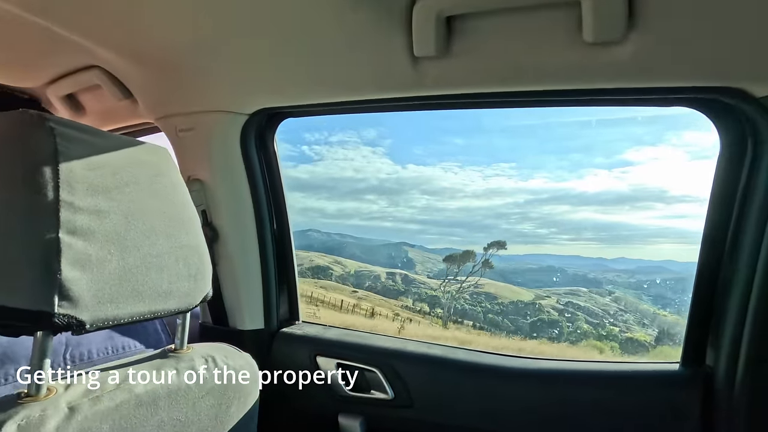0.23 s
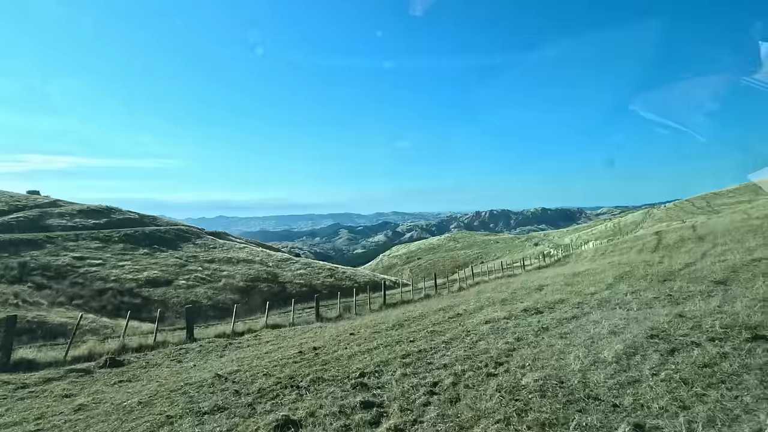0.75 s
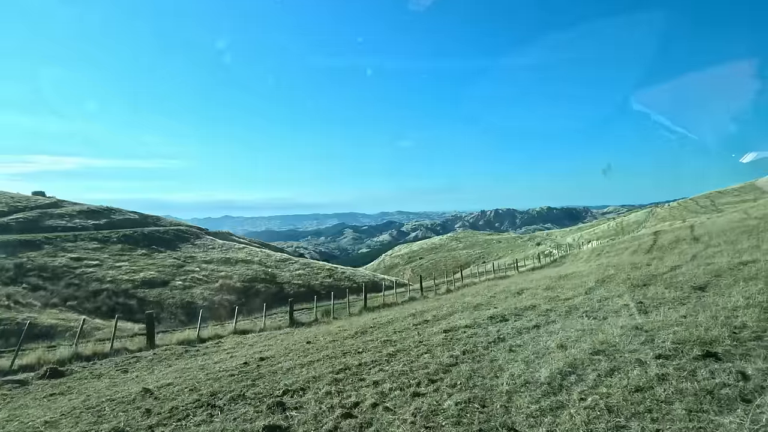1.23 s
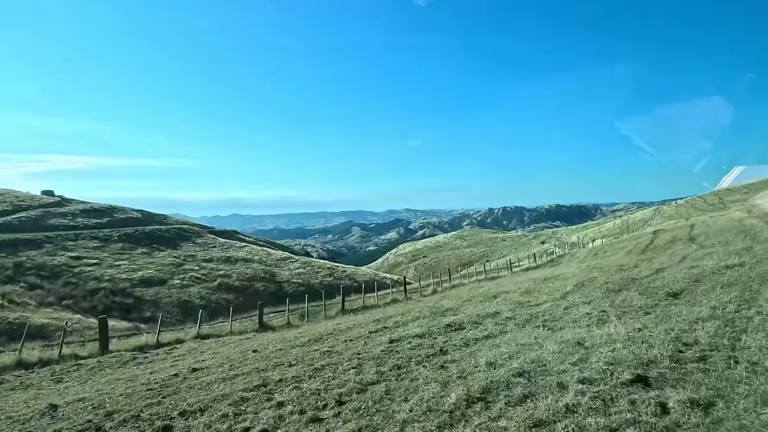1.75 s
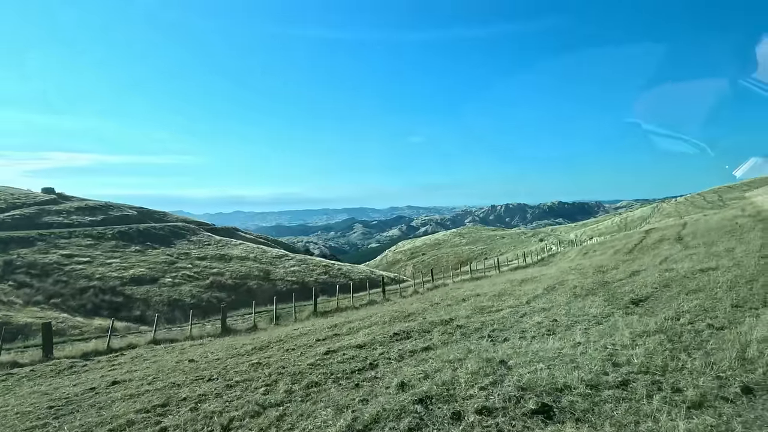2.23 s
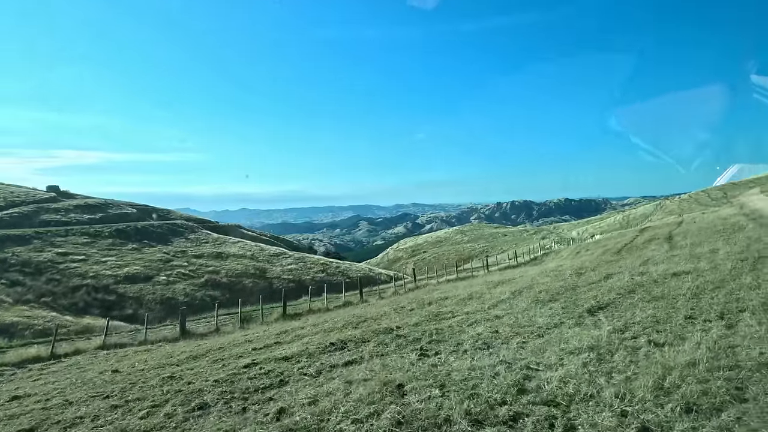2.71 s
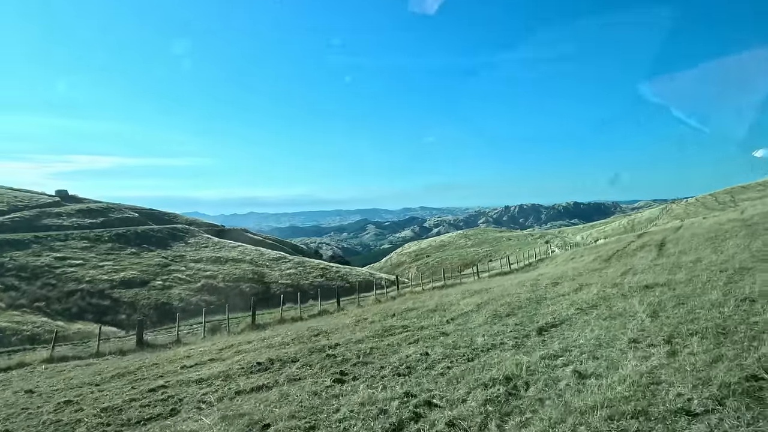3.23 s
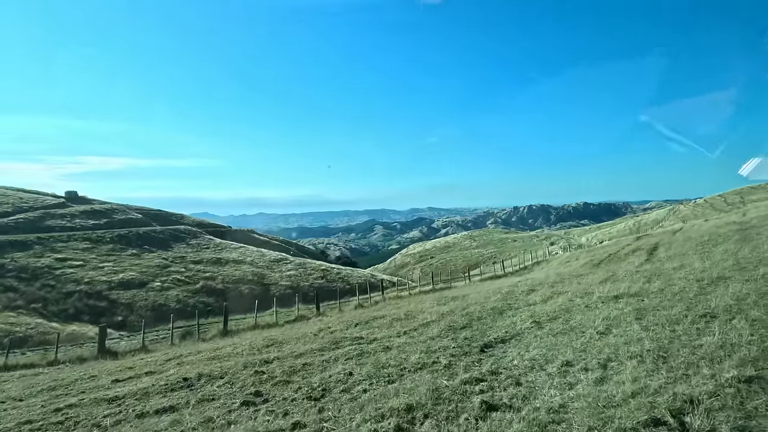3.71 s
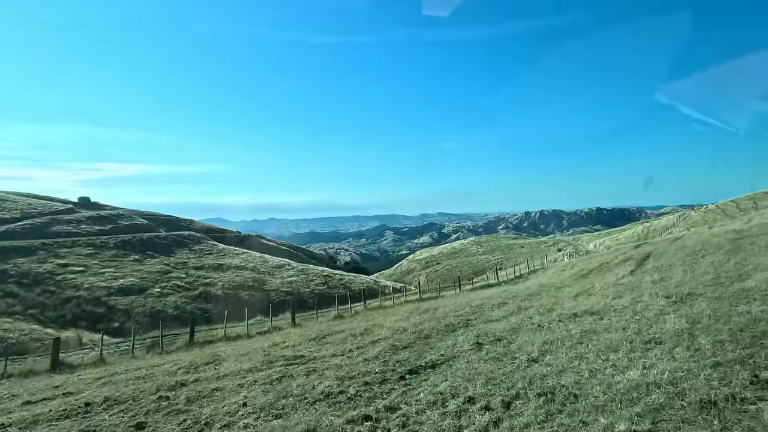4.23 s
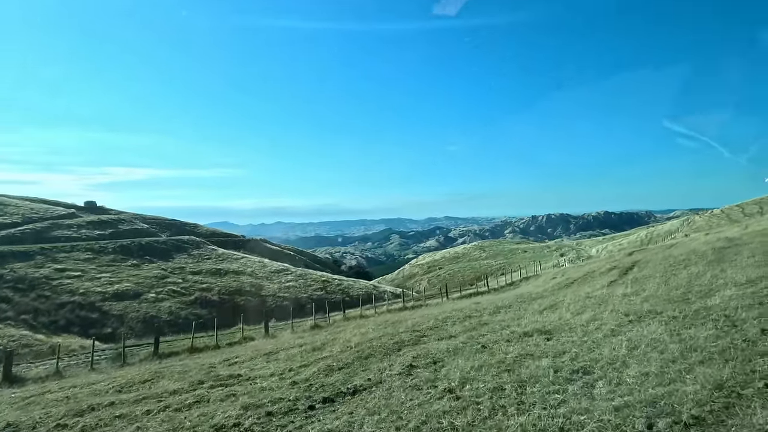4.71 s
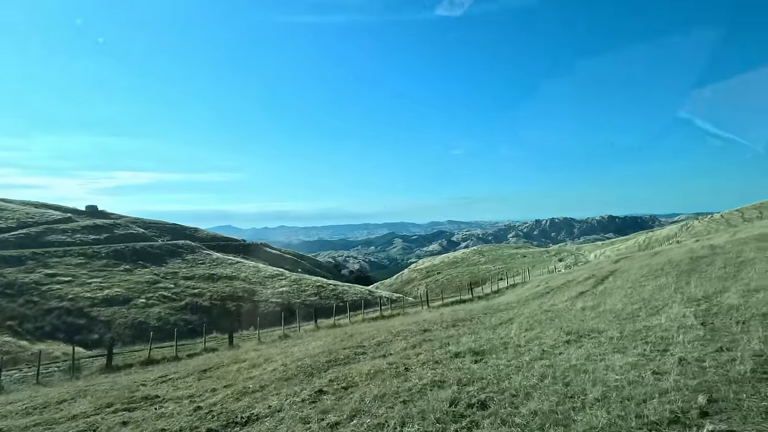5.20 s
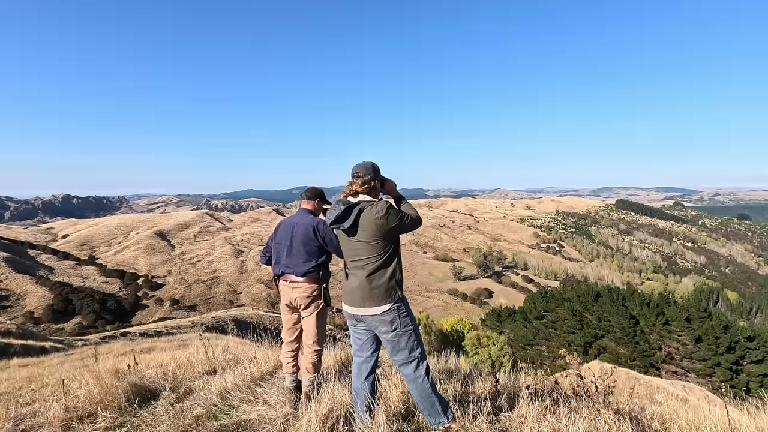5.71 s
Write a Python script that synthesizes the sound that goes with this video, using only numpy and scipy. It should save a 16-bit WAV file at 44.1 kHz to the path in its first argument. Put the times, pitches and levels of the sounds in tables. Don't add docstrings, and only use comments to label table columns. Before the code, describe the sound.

Close stereo microphone inside a car driving slowly over bumpy pasture: very deep heaving boom, tyre rumble and muffled road roar. A change of seat at 0.7 s brings in a wavering gear hum. Thuds, plastic clacks, buckle rattles, fabric rustles and faint squeaks come irregularly. At about 5.5 s it cuts to an open hill, where wind buffets the bare microphone.

```python
import sys
import numpy as np
from scipy import signal
from scipy.fft import rfft, irfft, next_fast_len
from scipy.io import wavfile
from scipy.ndimage import uniform_filter1d, map_coordinates

SR = 44100
rng = np.random.default_rng(int(sys.argv[2]) if len(sys.argv) > 2 else 0)


def to_wav(sig):
    pcm = np.clip(np.atleast_2d(sig), -1, 1) * 32767
    pcm = np.round(pcm).astype(np.int16)
    wavfile.write(sys.argv[1], SR, pcm.T)


def volts_from_db(level):
    exponent = np.asarray(level, float) / 20
    return 10 ** exponent


N = 262826
SEAT_CUT_S, OUTDOOR_CUT_S = .705, 5.46

# [time_s, pitch_hz]
BOOM = [(0, 16.65), (1.3, 20.3), (2.2, 18.35), (2.6, 17.54), (4.0, 17), (4.7, 16.65), (5.5, 18.2)]
# [peak_s, boom_db]
HEAVES = [(0, -16), (.15, -17), (.38, -14), (.6, -16.5), (.78, -16.5), (1.08, -22.5), (1.265, -12),
          (1.498, -16.5), (1.72, -18), (2.0, -18.5), (2.221, -14), (2.63, -11.5), (2.9, -18), (3.1, -19.5),
          (3.428, -14.5), (3.82, -16), (4.049, -18.5), (4.27, -15.5), (4.57, -13), (4.8, -26),
          (4.98, -13.5), (5.33, -12.5)]
# [freq_hz, density_db]
SHAKE = [(5, -12), (9, -12), (14, -5), (25, -5), (34, -3.5), (42, -13), (60, -31.5), (150, -120)]
# [time_s, level_db]
GROUND = [(0, 2.5), (.25, 4), (.7, 5.5), (.8, -1), (1.6, -5), (1.9, 5.5), (2.15, -0.5), (2.65, -2),
          (2.95, 2.5), (3.7, -2.5), (3.95, 4), (4.3, -0.5), (4.63, -2), (4.8, -1), (5.05, -1.5),
          (5.35, 4.5), (5.45, -0.5)]
# [freq_hz, density_db]
RUMBLE = [(30, -26.5), (45, 2), (70, -5), (108, -10.5), (150, -17.5), (250, -57), (400, -120)]
# [freq_hz, density_db]
ROAD_REAR = [(90, -39.5), (140, 4.5), (200, -8.5), (330, -10.5), (420, -19.5), (670, -21), (705, -16.5),
             (745, -20), (1500, -31.5), (3000, -39.5), (6000, -120)]
# [freq_hz, density_db]
ROAD_FRONT = [(85, -38.5), (140, -14), (176, 3), (220, -6), (283, -6), (467, -14), (670, -26.5), (830, -29),
              (990, -24), (1700, -35), (3000, -41.5), (6000, -120)]
# [start_s, length_s, roar_db]
ROAR_SWELLS = [
    (0.947, 0.21, 0),
    (1.217, 0.6, -3),
    (2.126, .18, 2),
    (2.347, 0.22, -0.5),
    (3.798, 0.3, -1),
    (4.456, .24, 3.5),
    (5.054, 0.58, 2),
]
# [freq_hz, likeness_0_to_1]
ALIKE = [(60, 1.0), (130, 1.0), (290, 0.98), (640, 0.87), (1410, 0.56), (3100, 0.47), (6820, 0.78),
         (15000, 0.68)]
# [time_s, mesh_hz, load_db]
GEARS = [(.7, 310, 5), (.95, 306.6, -0.5), (1.25, 261.8, -2), (1.5, 267.3, 0), (1.8, 287, -1.5),
         (2.3, 300.3, -4), (2.8, 319.7, -19), (3.0, 341, 0), (3.3, 320, -30), (3.8, 340.4, -0.5),
         (4.0, 306.9, 3), (4.2, 310, 2), (4.45, 330.8, 4), (4.7, 321, 1.5), (4.85, 319.1, 2),
         (5.0, 341.3, 1), (5.2, 343.1, 3), (5.45, 333.4, -6)]
# [start_s, length_s, level_db]
PULLS = [
    (0.754, 0.58, -34),
    (1.747, .5, -42),
    (3.71, 0.51, -32.5),
    (4.65, .75, -32.5),
]
# [start_s, thud_db, clack_db, ring_db]
CLACKS = [
    (0.709, -47, -41.5, -58),
    (1.828, -34, -33.5, -40),
    (1.896, -29.5, -54, -41),
    (3.033, -48, -37, -43.5),
    (3.662, -61, -45, -55),
    (3.724, -38, -28.5, -29.5),
    (4.999, -43, -30.5, -35.5),
]
# [start_s, thud_db, clack_db, rattle_db, chatter_s]
JOLTS = [(0.104, -42, -46, -51.5, 0.023), (0.536, -38.5, -49.5, -47.5, 0.017),
         (0.617, -47, -45.5, -44.5, 0.018), (0.766, -40, -45, -54, 0.01), (0.949, -48, -70, -63, 0.015),
         (1.88, -48, -60, -62, 0.019), (1.9, -25, -40, -31.5, 0.025), (1.981, -32, -39, -38.5, 0.031),
         (2.007, -30, -43, -43, 0.033), (2.061, -58, -48, -40, 0.021), (2.567, -36, -50, -43.5, 0.025),
         (2.804, -36, -40, -42, 0.056), (2.868, -21.5, -35, -35, 0.031), (3.604, -28.5, -56, -46, 0.016),
         (3.903, -25, -65, -43, 0.033), (3.943, -34, -58, -47, 0.02), (4.016, -22.5, -56, -33.5, 0.025),
         (4.199, -32.5, -42, -43, 0.018), (4.43, -52, -42, -46, 0.016), (5.017, -43, -38, -49, 0.025),
         (5.237, -26.5, -66, -51, 0.02), (5.347, -24, -37, -37.5, 0.017), (5.37, -36, -34.5, -45, 0.0086)]
# [freq_hz, level_db, t60_share]
THUD = [(179, 5, 0.49), (265.7, 6.5, 1), (310, -2.5, 0.58)]
# [freq_hz, level_db, t60_share]
CLACK = [(405, -2, 0.26), (462, 1.5, 0.65), (560, 6, 0.17)]
# [freq_hz, level_db, t60_share]
PLASTIC = [(640, 0, .4), (745, -3, .4), (980, 4, .4), (1080, -2, .5), (1300, -3, .7), (1580, -10, 1.7),
           (1850, -5, .35), (2420, -13, .6), (2900, -15, .4), (3600, -16, .4), (3960, -11, .3)]
# [freq_hz, level_db, t60_share]
RATTLE = [(724, -2, 2.2), (976, 1, 1.2), (1135, 4, 0.9), (1304, 1, 1.2), (1500, -3, 0.9), (2070, -14, .6)]
# [freq_hz, level_db, t60_share]
RATTLE_REAR = [(624, 0, 1.3), (715, 3, 1.5), (935, -10, 2), (1150, -1, 1.7), (1255, 4, 1.8),
               (1400, -6, 0.93)]
# [start_s, pitch_hz, level_db,
# t60_s]
KNOCKS = [(0.33, 121, -32, .2), (0.69, 70, -25, 0.25), (1.8975, 184, -19.5, 0.088), (1.978, 170, -26, .05),
          (2.005, 166, -25, 0.063), (2.78, 100, -31, .25), (3.17, 102, -32, .25),
          (3.46, 100.5, -30.5, 0.36), (3.9, 142, -31, .25), (4.431, 340, -32.5, 0.046),
          (5.01, 103, -29, .2), (5.31, 102, -30, .25), (5.371, 379.6, -34, .04),
          (0.55, 700, -44, .04), (.617, 630, -37, .045), (.708, 440, -38, .03), (.709, 800, -45, .02),
           (.63, 900, -46, .03), (1.46, 170, -36, 0.6), (1.836, 990, -34, .04), (2.8, 1000, -44, 0.033),
           (3.16, 5700, -60, 0.12), (3.195, 5650, -59, .08), (4.801, 2400, -52, .02),
           (3.745, 1050, -40, .025), (3.772, 1250, -47, .02), (3.773, 2400, -54, .025),
           (5.003, 990, -35, .04), (5.021, 1070, -34, .03), (5.026, 850, -42, .025),
           (5.028, 1520, -44, .03), (5.446, 1040, -46, 0.03), (5.451, 420, -33, 0.034),
          (0.104, 700, -40, 0.045), (0.123, 860, -44, .02), (0.309, 1560, -50, .02), (0.311, 1200, -50, .02),
         (0.539, 1240, -45, .03), (0.546, 1270, -46, 0.033), (0.616, 1400, -45, 0.028),
         (0.626, 1230, -40, .035), (0.64, 1290, -46, .03), (0.754, 1400, -45, 0.023),
         (0.767, 1040, -42, .025), (0.768, 1390, -46, .025), (2.098, 1900, -36, 0.0089),
         (2.105, 3000, -45, .006), (2.28, 2500, -50, .006), (2.83, 1050, -46, 0.037),
         (2.886, 462, -29, 0.04), (2.888, 1150, -42, .02), (2.902, 990, -40, 0.033),
         (2.903, 480, -42, .025), (3.041, 977, -38, .05), (3.042, 1560, -55, 0.046),
         (3.736, 1570, -41, .09), (3.737, 2300, -50, .02), (4.432, 875, -42, .02),
         (4.437, 1440, -44.5, .04), (4.45, 1220, -44, .03), (4.5, 560, -46, .04), (4.52, 1110, -48, .04),
         (4.526, 915, -46, .03), (4.57, 500, -45, .04), (5.196, 956, -48, .03), (5.228, 1346, -46, .03),
         (5.366, 1353, -49, .025)]
# [freq_hz, density_db]
FABRIC = [(400, -61), (1200, -10), (2200, -10), (3500, -8.5), (4200, -11), (7600, -13.5), (8300, -18),
          (10500, -21), (11500, -29.5), (14500, -37), (15800, -38.5), (18000, -120)]
# [start_s, length_s, level_db]
STROKES = [(0.157, 0.028, -69), (0.247, 0.024, -70), (0.358, 0.35, -65), (0.76, 0.38, -74),
           (1.323, 0.17, -62), (1.617, 0.062, -78), (1.757, 0.14, -54.5), (1.863, 0.11, -53.5),
           (1.933, .16, -47.5), (2.109, 0.17, -61.5), (2.367, 0.099, -60.5), (2.473, 0.082, -60.5),
           (2.602, 0.087, -52.5), (2.722, 0.098, -63.5), (2.789, 0.12, -59.5), (3.047, 0.1, -62),
           (3.16, 0.097, -59), (3.351, 0.034, -65), (3.379, 0.31, -61.5), (3.665, 0.1, -64.5),
           (3.878, 0.041, -71), (3.97, 0.12, -61), (4.406, 0.082, -63.5), (4.488, 0.083, -51.5),
           (4.562, 0.11, -55.5), (4.757, 0.19, -60), (4.937, 0.11, -61), (4.999, 0.081, -55.5),
           (5.17, 0.27, -62.5), (5.397, 0.094, -79)]
# [start_s, peak_db]
RUBS = [(0.3755, -39), (0.8375, -42), (0.9606, -36), (1.1885, -33), (1.667, -38), (2.139, -51),
        (2.609, -44), (2.7413, -38), (3.554, -35), (4.0532, -49), (4.17, -37), (4.22, -36), (4.8035, -58),
        (5.1811, -52)]
# [start_s, peak_db]
CATCHES = [(0.0832, -54), (0.1101, -56), (0.1461, -55), (0.2478, -52), (0.336, -49), (0.7944, -40),
           (0.853, -47.5), (0.8864, -50), (1.0544, -52), (1.3575, -36), (1.3927, -42), (1.4486, -50),
           (1.7469, -55), (2.098, -38), (2.162, -50), (2.278, -48), (2.2523, -48), (2.3845, -46),
           (3.0894, -47), (3.3513, -37.5), (3.4765, -44), (3.5249, -56), (3.71, -50), (3.8781, -49),
           (3.9838, -48), (4.2428, -46), (4.3435, -43), (4.4548, -44), (4.508, -38), (4.5955, -52),
           (4.6907, -49), (4.7546, -39), (4.779, -56), (5.02, -42), (5.0998, -50), (5.1527, -48),
           (5.2106, -39), (5.3063, -46), (5.4211, -51)]
# [time_s, peak_db]
SNAPS = [(0.7887, -53), (0.9604, -49), (1.0536, -52), (1.1848, -47), (1.355, -50), (1.4492, -50),
         (1.6233, -54), (1.6662, -49), (1.7466, -48), (2.1392, -49), (2.1646, -46), (2.199, -46),
         (2.2524, -48), (2.3851, -54), (2.5068, -54), (2.6096, -49), (2.6415, -38), (2.7418, -49),
         (3.0905, -45), (3.1609, -54), (3.2023, -45), (3.3429, -53), (3.4417, -42), (3.4766, -47),
         (3.525, -48), (3.556, -47), (3.6702, -46), (3.7101, -51), (3.7256, -44), (3.8782, -53),
         (3.984, -49), (4.1711, -49), (4.2429, -52), (4.3437, -52), (4.4913, -47), (4.5068, -40),
         (4.5956, -47), (4.7547, -50), (4.7792, -52), (5.0994, -53), (5.1179, -53), (5.1813, -51),
         (5.2366, -48), (5.3065, -46), (5.3274, -50)]
# [start_s, pitch_hz, level_db, length_s, hoarseness]
SQUEAKS = [(0.83, 3260, -60, 0.046, 1.2), (0.953, 3190, -65, 0.036, 1.1), (3.151, 3220, -60, 0.13, 0.93),
           (3.34, 3400, -62, 0.032, 1.5), (3.425, 3500, -69, 0.22, 2), (5.2, 3483, -66, 0.2, 1.1),
           (3.903, 3440, -59, 0.075, 0.32), (4.075, 3450, -58, 0.071, 0.5), (4.3, 3550, -66, 0.06, 1.4),
           (4.027, 3460, -61, 0.069, .9), (4.971, 3500, -54.5, 0.11, 0.91), (5.143, 3580, -65, 0.13, 1.6),
           (5.412, 3400, -53, 0.041, 0.54)]
# [time_s, level_db]
WIND = [
    (5.44, -24),
    (5.52, -23),
    (5.575, -32.5),
    (5.63, -24),
    (5.7, -33),
    (5.78, -44),
    (5.82, -35),
    (5.9, -31.5),
    (5.96, -34),
]
# [start_s, over_flutter_db, length_s, sharpness_db]
GUSTS = [
    (5.468, 6, 0.022, 13.5),
    (5.489, 0, 0.018, 17),
    (5.53, 4, 0.038, -12),
    (5.603, 12, 0.034, -12),
    (5.662, -4, 0.035, -18),
    (5.685, 14, 0.04, -7),
    (5.881, 6.5, 0.032, -1),
]
# [freq_hz, density_db]
BUFFET = [(5, -19), (12, -2), (40, 0.5), (90, -7), (150, -11.5), (400, -120)]
# [freq_hz, density_db]
FLUTTER = [(60, -69), (150, 6), (300, -4.5), (500, -14), (900, -36.5), (3000, -120)]
# [freq_hz, density_db]
AIR = [(150, -47), (450, -0.5), (1000, -1), (2000, -11), (4500, -21.5), (8000, -31.5), (11500, -37),
       (12300, -120)]
# [start_s, length_s, first_hz, last_hz, level_db]
SWIRLS = [
    (5.477, 0.017, 560, 274, -26),
    (5.5052, .006, 129, 110, -18.5),
    (5.506, 0.0042, 805, 600, -34),
    (5.601, 0.014, 70.6, 79.6, -21),
    (5.619, 0.023, 606, 221, -30),
    (5.644, 0.042, 85.5, 95, -25.5),
    (5.695, 0.012, 202, 160, -30.5),
]


def unit(x):
    return x / np.sqrt(np.mean(x ** 2) + 1e-20)


def along(points, hz):
    f, v = np.transpose(points)
    return np.interp(np.log(hz + 1), np.log(f + 1), v)


def curves(rows):
    s, *cols = np.transpose(rows)
    return [np.interp(np.arange(N) / SR, s, c) for c in cols]


def after(s, fade_s):
    return np.clip((np.arange(N) / SR - s) / fade_s + .5, 0, 1)


def hump(s, length_s, power):
    return np.sin(np.pi * np.clip((np.arange(N) / SR - s) / length_s, 0, 1)) ** power


def wobble(rate_hz):
    knots = rng.standard_normal(int(N * rate_hz / SR) + 4)
    return map_coordinates(knots, [np.arange(N) * rate_hz / SR])


def filtered(x, response):
    m = next_fast_len(N + 8192)
    return irfft(rfft(x, m) * response(np.fft.rfftfreq(m, 1 / SR)), m)[..., :N]


def highpassed(x, corner_hz):
    return filtered(x, lambda hz: 1 / (1 + (corner_hz / (hz + 1)) ** 4))


def rush(spectrum, alike, patchy_db, even=0, window_s=.03):
    z = signal.stft(rng.standard_normal((2, N)), nperseg=512)[2]
    field = uniform_filter1d(rng.standard_normal(z.shape[1:]), size=6, axis=0)
    field = uniform_filter1d(field, size=8, axis=1)
    pair = signal.istft(z * volts_from_db(patchy_db * unit(field)), nperseg=512)[1][:, :N]

    def mid_side(hz):
        turn = np.arccos(np.clip(along(alike, hz), -1, 1)) / 2
        return volts_from_db(along(spectrum, hz)) * [np.cos(turn), np.sin(turn)]

    mid, side = filtered(pair, mid_side)
    swell = np.abs(uniform_filter1d(unit(mid) ** 2, int(window_s * SR))) + 1e-2
    return unit(np.array([mid + side, mid - side]) / swell ** (even / 2))


def tone(hz, blur_rad, rate_hz):
    wander = wobble(rate_hz)
    return -np.sqrt(2) * np.cos(2 * np.pi * np.cumsum(hz) / SR + blur_rad * (wander - wander[0]))


def panned(x, pan_db):
    return x * volts_from_db(np.array([[pan_db / 2], [-pan_db / 2]]))


def cabin():
    calm_db, half_s = -25, 0.18
    heaves = sum(volts_from_db(db - 2.5) * hump(s - half_s, 2 * half_s, 2.66) for s, db in HEAVES)
    level = volts_from_db(calm_db) + heaves
    boom = level * tone(curves(BOOM)[0], blur_rad=0.81, rate_hz=8)
    shake_db = -25 + 0.5 * curves(GROUND)[0] + 1.8 * wobble(4.8)
    shake = volts_from_db(shake_db) * (level / level.mean()) ** -0.29
    noise = rush(SHAKE, [(20, 0.99)], patchy_db=5, even=0.95, window_s=0.23)
    return panned(boom, -0.58) + shake * panned(noise, -.6)


def tyres():
    rough_db, = curves(GROUND)
    front = after(SEAT_CUT_S, fade_s=0.0062)
    road = front * rush(ROAD_FRONT, ALIKE, patchy_db=2)
    road = road + (1 - front) * rush(ROAD_REAR, ALIKE, patchy_db=1.2)
    patch_db = sum(db * hump(s, length_s, 1) for s, length_s, db in ROAR_SWELLS)
    road_db = -45.5 + 2.5 * front + 0.22 * rough_db + 0.91 * wobble(13) + patch_db
    rumble = rush(RUMBLE, ALIKE, patchy_db=2.5, even=0.24, window_s=0.062)
    return volts_from_db(-30.5 + rough_db) * rumble + volts_from_db(road_db) * road


def gears():
    mesh_hz, load_db = curves(GEARS)
    mesh_db = -52.5 + 0.51 * load_db - 0.0176 * (mesh_hz - 300)
    upper = volts_from_db(mesh_db + 0.4 * wobble(11)) * tone(mesh_hz, blur_rad=0.3, rate_hz=6.5)
    lower_db = -45.5 + load_db + .9 * wobble(8.4)
    lower = volts_from_db(lower_db) * tone(mesh_hz * .541, blur_rad=0.3, rate_hz=12)
    axle_hz = np.full(N, 698)
    whine = volts_from_db(-64.5 + 2 * wobble(14)) * tone(axle_hz, blur_rad=.7, rate_hz=20)
    front = after(SEAT_CUT_S, fade_s=0.0068)
    return front * (upper + lower) + (1 - front) * whine


def engine():
    firing_hz = curves(GEARS)[0] * .1803
    throb = tone(firing_hz, blur_rad=.3, rate_hz=5)
    return sum(volts_from_db(db) * hump(s, length_s, .7) for s, length_s, db in PULLS) * throb


def ring(modes, t, t60_s, scatter_db):
    out = 0
    for hz, db, share in modes:
        strength, detune = rng.standard_normal(2)
        decay = volts_from_db(db + scatter_db * strength - 60 * t / (t60_s * share))
        out = out + decay * np.sin(2 * np.pi * hz * (1 + 0.016 * detune) * t)
    return out


def bumps():
    out, t = np.zeros((2, N + SR)), np.arange(SR // 5) / SR

    def panel(db):
        return volts_from_db(db) * ring(THUD, t, t60_s=0.065, scatter_db=-1.5)

    def trim(db):
        return volts_from_db(db) * ring(CLACK, t, t60_s=0.078, scatter_db=2.0)

    for s, thud_db, clack_db, ring_db in CLACKS:
        blow = panel(thud_db) + trim(clack_db)
        blow = blow + volts_from_db(ring_db) * ring(PLASTIC, t, t60_s=.06, scatter_db=1.2)
        crack = uniform_filter1d(rng.standard_normal(len(t)), size=6)
        crack = uniform_filter1d(crack, size=5) * 1.65
        blow = blow + volts_from_db(ring_db - 8.5 - 60 * t / 0.042) * crack
        out[:, round((s + .001) * SR):][:, :len(t)] += panned(blow * (1 - np.exp(-t / .0005)), 2.2)
    for s, thud_db, clack_db, rattle_db, chatter_s in JOLTS:
        contacts = rng.standard_normal(len(t)) * np.exp(-(t / chatter_s) ** 2)
        contacts = contacts * (1 - np.exp(-t / 0.003))
        contacts = contacts / np.linalg.norm(contacts)
        small = RATTLE if s > .8 else RATTLE_REAR
        parts = panel(thud_db - 3) + trim(clack_db + 1.5)
        parts = parts + volts_from_db(rattle_db + 1.5) * ring(small, t, t60_s=.016, scatter_db=1.5)
        parts = parts * (1 - np.exp(-t / 0.00095))
        chatter = signal.fftconvolve(parts, contacts)[:len(t)]
        out[:, round(s * SR):][:, :len(t)] += panned(chatter, .6)
    return out[:, :N]


def thumps():
    out = np.zeros(N)
    for s, hz, db, t60_s in KNOCKS:
        u = (np.arange(N) / SR - s).clip(0)
        out -= volts_from_db(db - 60 * u / t60_s) * np.sin(2 * np.pi * hz * u) * (1 - np.exp(-u / 0.001))
    return out


def cloth():
    t = np.arange(SR // 5) / SR
    rest_db = -75.5 + 7 * after(SEAT_CUT_S, fade_s=0.076)
    level = volts_from_db(rest_db + 5.5)
    level = level + sum(volts_from_db(db - 1.0) * hump(s, length_s, 0.88) for s, length_s, db in STROKES)
    for s, db in RUBS:
        level[round(s * SR):][:len(t)] += volts_from_db(db - 16.0 - 60 * t / 0.036) * (1 - np.exp(-t / 0.0027))
    for s, db in CATCHES:
        level[round(s * SR):][:len(t)] += volts_from_db(db - 13.0 - 60 * t / 0.037) * (1 - np.exp(-t / 0.0017))
    for s, db in SNAPS:
        level[round((s - .003) * SR):][:len(t)] += volts_from_db(db - 17) * np.exp(-((t - .005) / 0.0021) ** 2)
    grit = volts_from_db(0.59 * wobble(28) + 0.54 * wobble(70) + 1.3 * wobble(300))
    hiss = rush(FABRIC, ALIKE, patchy_db=1.5)
    top = highpassed(hiss, 6000)
    flicker = volts_from_db(2.4 * wobble(32)) * (level / volts_from_db(-67.5)) ** 0.072
    return unit(grit) * level * (hiss - top + flicker * top)


def squeaks():
    t, out = np.arange(N) / SR, np.zeros(N)
    rough_db, drift_rad = 4.1 * wobble(200), 2.0 * wobble(280)
    for s, hz, db, length_s, hoarse in SQUEAKS:
        stroke = volts_from_db(db + hoarse * rough_db) * hump(s, length_s, 1.3)
        out += stroke * np.sin(2 * np.pi * hz * t + hoarse * drift_rad)
    return out


def interior(x):
    t = np.arange(SR // 8) / SR
    tail = rng.standard_normal((2, len(t))) * volts_from_db(-60 * t / 0.16)
    wet = signal.fftconvolve(x, tail / np.linalg.norm(tail[0]), axes=1)[:, :N]
    return highpassed(wet, 450)


def wind():
    strength_db, = curves(WIND)
    mono, since_s = [(20, 1)], (np.arange(N) / SR - OUTDOOR_CUT_S).clip(0)
    burst_db = sum(db * hump(s, length_s, 1.1) for s, db, length_s, _ in GUSTS)
    sharp_db = sum(db * hump(s, length_s, 0.52) for s, _, length_s, db in GUSTS)
    buffet = rush(BUFFET, mono, patchy_db=-1.5, even=0.72, window_s=0.059)
    buffet = volts_from_db(strength_db + 0.32 * burst_db) * buffet
    flutter = rush(FLUTTER, mono, patchy_db=0.5, even=0.51, window_s=0.042)
    flutter = flutter + (volts_from_db(sharp_db) - 1) * highpassed(flutter, 650)
    flutter_db = -34.5 + 1.38 * (strength_db + 25) - 14.3 * since_s + burst_db
    air = rush(AIR, mono, patchy_db=1.0)
    hiss_db = 9.5 - 9.5 * after(5.71, fade_s=0.15)
    air = air + (volts_from_db(hiss_db) - 1) * highpassed(air, 1800)
    return buffet + volts_from_db(flutter_db) * flutter + volts_from_db(-61) * air


def swirls():
    out = np.zeros(N)
    for s, length_s, first_hz, last_hz, db in SWIRLS:
        u = (np.arange(N) / SR - s).clip(0, length_s)
        cycles = u * (first_hz + (last_hz - first_hz) * u / (2 * length_s))
        out -= volts_from_db(db) * hump(s, length_s, 1) * np.sin(2 * np.pi * cycles)
    return out


def scene():
    knocks = bumps() + squeaks() + thumps()
    inside = cabin() + tyres() + gears() + engine() + knocks + volts_from_db(-8.0) * interior(knocks)
    outdoors = after(OUTDOOR_CUT_S, fade_s=0.011)
    rustle = (1 - after(OUTDOOR_CUT_S + 0.0062, fade_s=.006)) * cloth()
    return (1 - outdoors) * inside + rustle + outdoors * (wind() + swirls())


def roll_off(x):
    return signal.sosfilt(signal.butter(12, 15710, fs=SR, output="sos"), x)


def record(dry):
    soft = dry / (1 + np.abs(dry / .43) ** 4) ** (1 / 4)
    return roll_off(soft)


dry = scene()
out = record(dry)
to_wav(out)
```